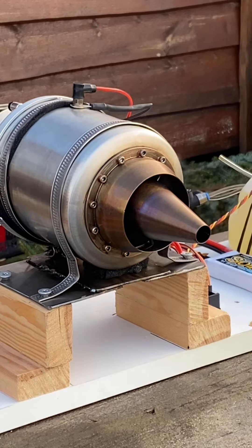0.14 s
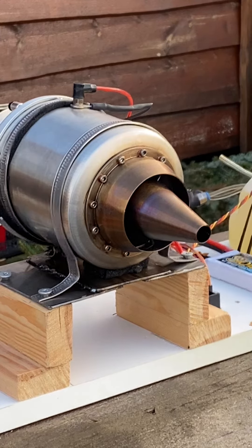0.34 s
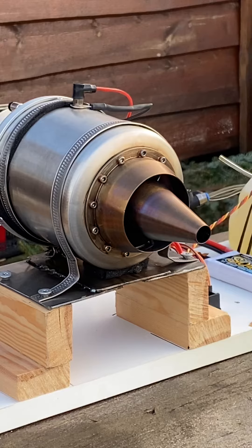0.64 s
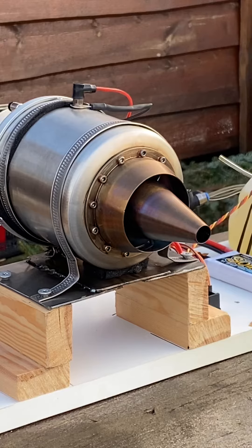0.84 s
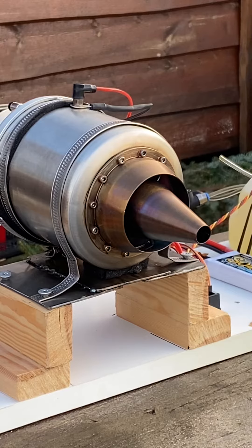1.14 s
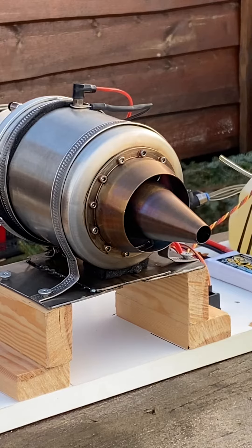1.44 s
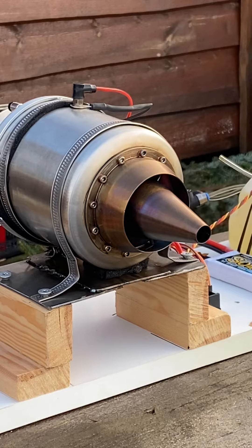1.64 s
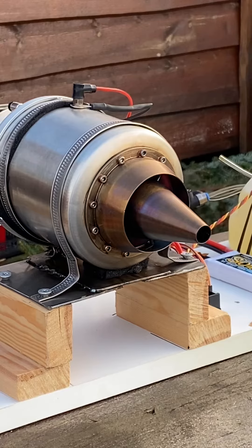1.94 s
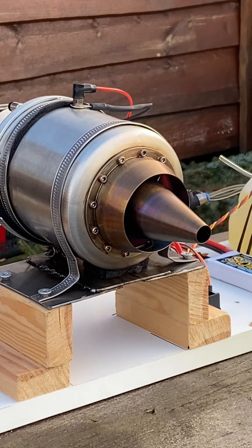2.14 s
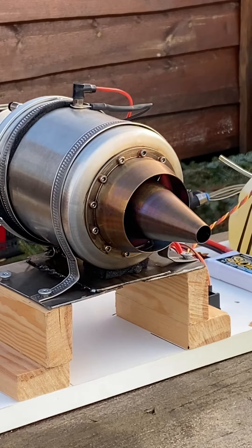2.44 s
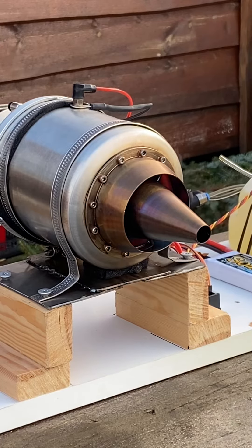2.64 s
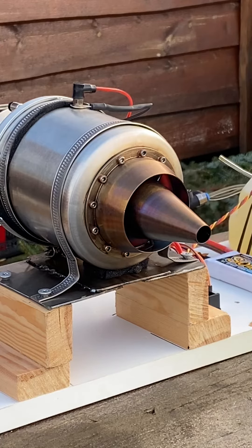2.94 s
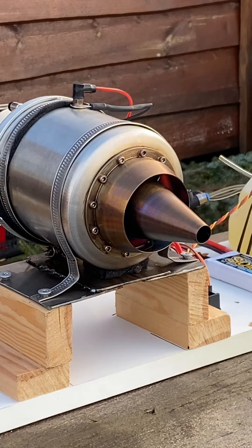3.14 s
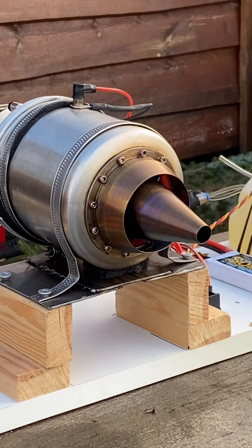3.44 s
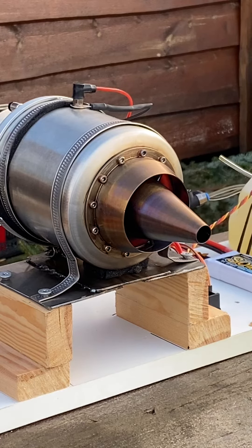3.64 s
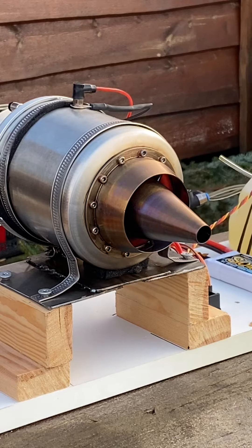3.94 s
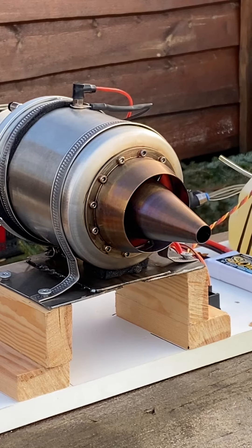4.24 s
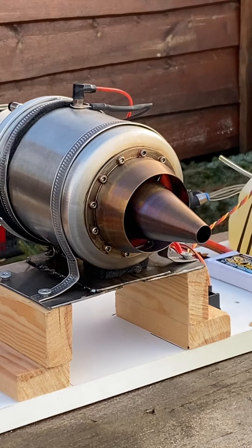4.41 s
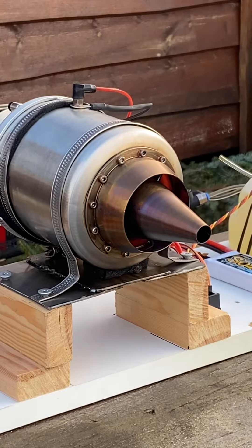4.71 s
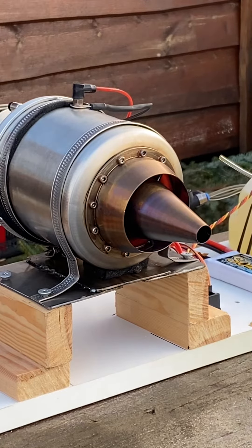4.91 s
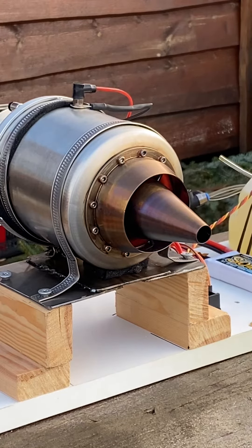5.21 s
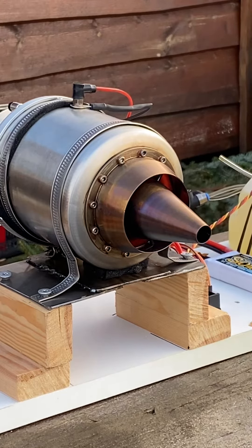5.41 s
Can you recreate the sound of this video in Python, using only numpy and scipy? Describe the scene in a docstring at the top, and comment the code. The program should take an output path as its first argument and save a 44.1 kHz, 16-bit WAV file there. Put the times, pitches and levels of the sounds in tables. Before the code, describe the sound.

For about 5.6 seconds a small turbojet runs close to a stereo microphone outdoors, dry and without audible echo. From 0 s it is already loud: an unevenly fluttering low burning rumble and roar, strongest around 200-400 Hz, a dense exhaust rush and a bright airy hiss. A compressor whine starts near 2.6 kHz and climbs almost steadily to about 4.5 kHz, while the turbine whine rises from 5 to nearly 8.7 kHz, with a still higher octave above. Thin, glassy bearing tones climb alongside, flickering and swelling through resonances. As the engine heats, the deep boom eases slightly and the noise changes colour. A barely noticeable puff comes at 0.75 s, then soft low thumps at 3.3-3.4, a stronger one at 3.65 and another at 3.8 s. From about 4.8 s a faint fuel pump tone near 1.7 kHz sings beneath. The sound ends abruptly, still rising.

```python
"""Small turbojet spooling up

A small turbojet spools up on a garden test stand, close to a stereo microphone.
Flame, exhaust and hiss are shaped noise whose colour shifts as the gas heats up with shaft speed.
Blade and bearing tones are sines locked to the shaft, swelling through duct and casing resonances.
Low puffs of uneven burning break in, and near the end the fuel pump's motor sings faintly.
The treble reaches the left microphone port a little before the right."""
import sys
import numpy as np
from scipy.fft import rfft, irfft, next_fast_len
from scipy.io import wavfile
from scipy.ndimage import map_coordinates

SR = 44100
rng = np.random.default_rng(int(sys.argv[2]) if len(sys.argv) > 2 else 0)


def store_pcm(level_fs):
    """Save levels as 16-bit WAV."""
    pcm = np.round(np.clip(level_fs, -1, 1) * 32767).astype(np.int16)
    wavfile.write(sys.argv[1], SR, np.atleast_2d(pcm).T)


N = 245637

# Shaft speed as it spools up, before a slight unsteadiness: [t/s, speed/(turns/s)]
SHAFT_SPEED = [(0.0, 216.78), (0.41, 228.24), (1.16, 248.32), (1.94, 270.29), (2.23, 279.59),
               (2.74, 295.56), (3.14, 307.13), (3.59, 318.54), (3.74, 322.56), (4.28, 336.32),
               (4.53, 343.14), (5.08, 362.14), (5.34, 369.63), (5.57, 376.67)]
# The gas is cool below the first shaft speed and hot above the second (turns/s)
COOL_SPEED, HOT_SPEED = 234.7, 340
TOP_HZ = 15800  # band limit of the whole sound
# Where boom gives way to roar, roar to exhaust, and exhaust to hiss: [f/Hz each]
EDGES_HZ = (420, 1380, 6800)

# Uneven level of the low noise: [t/s, spread (Gaussian sigma)/s, boom change/dB, roar change/dB]
LOW_NOISE_CHANGES = [(0.075, 0.018, 0.5, 3.5), (0.235, 0.034, -2.5, 1.5), (0.338, 0.014, 1, 0),
                     (0.467, .016, -1, 3), (0.59, 0.018, -0.5, -2), (0.7, 0.017, 3, .6),
                     (0.943, 0.054, 0, 2.5), (1.03, 0.016, 1, -0.5), (1.25, .015, 1.5, 1),
                     (1.343, .035, -2, -2), (1.635, 0.026, 2.5, -0.5), (1.76, .025, 0, -2),
                     (1.93, 0.031, -3, 2), (2.17, .016, 0.5, 0.5), (2.25, 0.028, 3, 0.5),
                     (2.37, 0.028, -2.5, -1.5), (2.426, .019, 3, 0), (2.567, 0.067, -1, 1),
                     (2.662, .015, 3.5, 2.5), (2.78, .016, 3, -1), (2.87, 0.016, 1, 4),
                     (3.248, 0.015, 1, 1.5), (3.36, 0.019, 1, 3.5), (3.433, 0.032, -2, -1.5),
                     (3.903, 0.013, 2.5, 1.5), (4.64, .018, -4, 0), (4.75, 0.021, 2.6, 1),
                     (4.92, .03, -0.5, -1.5), (4.99, .016, -2, 0.5), (5.143, .045, 0.5, 1),
                     (5.468, 0.011, -5, -1.3)]
# Low puffs of uneven burning: [t/s, level before the low cut/dB, starting f/Hz]
PUFFS = [(0.742, -29, 55), (3.297, -17.5, 165), (3.364, -25, 100), (3.638, -12.5, 190), (3.803, -23, 150)]
# Relative colour of the burning: [f/Hz, cool, half warmed and hot level/(dB per Hz)]
COMBUSTOR_COLOUR = [(21.1, -51, -48, -49), (60.3, -20, -17.5, -15), (88.5, -20, -18, -16),
                    (127, -11, -9.5, -7), (164, -4.5, -7.5, -5), (188, -2.0, 0, -3.5), (262, -3, 2, -0.5),
                    (294, -4, -4.5, 1), (367, 2.5, -0.5, 0), (448, -4, 0, -3.5), (535, -7, -5, -0.5),
                    (628, -10.5, -8.5, -4.5), (743, -12, -11, -11), (830, -19, -15.5, -16),
                    (1004, -21, -13.5, -13.5), (1227, -30.5, -24.5, -26.5), (1430, -31.5, -33, -25)]
# Relative colours of the exhaust and the hiss: [f/Hz, cool level/(dB per Hz), hot level/(dB per Hz)]
EXHAUST_COLOUR = [(1462, -14.5, -18), (1477, 0, -2.5), (1550, -5.5, -8), (1970, 3.5, -0.5), (2210, 3, 1.5),
                  (2390, 0, -1), (3360, -2, -5), (3920, -7, -3), (4230, -9.5, -8.5), (4250, -3, -4.5),
                  (4860, -3.5, -2.5), (5370, -1.5, -3), (5300, 1, -4), (7540, -15.5, -13.5)]
HISS_COLOUR = [(6700.0, -4.0, -4.1), (7300.0, 0.0, -0.5), (7900.0, -2.7, -0.1), (8400.0, -2.7, -2.3),
               (9400.0, -4.9, -1.9), (10000.0, -4.9, -4.1), (10600.0, -3.7, -5.5), (11050.0, -1.6, -4.9),
               (11600.0, -3.9, -5.3), (12100.0, -1.0, -2.8), (12500.0, -4.5, -4.2), (13200.0, -3.1, -2.6),
               (14300.0, -3.5, -3.1), (15700.0, -5.6, 0.0)]
# Base level of each kind of turbulence: [cool level/dB, half warmed level/dB, hot level/dB]
BOOM_LEVEL_DB = (-16.5, -18, -21)
ROAR_LEVEL_DB = (-21.5, -21, -22.5)
EXHAUST_LEVEL_DB = (-26.5, -26, -26.5)
HISS_LEVEL_DB = (-31.5, -34, -30.5)

# Compressor tone, turbine tone and the turbine's octave: [cycles per turn each]
BLADE_ORDERS = (12, 23, 46)
# Depth of the blade tones' flicker: [cool depth/dB, half warmed depth/dB, hot depth/dB]
BLADE_WAVER_DB = (2.0, 1.2, 1.0)
# Duct resonances that each blade tone swells through: [f/Hz, width/Hz, relative level/dB]
DUCT_RESONANCES = [(2810, 60, -39.5), (2895, 50, -39.5), (2965, 50, -40), (3055, 40, -40),
                   (3159, 30, -35.3), (3400, 130, -35.5), (3560, 460, -31.2), (3680, 60, -37),
                   (3775, 50, -36.5), (3825, 45, -35.5), (3965, 45, -39), (4015, 40, -40.5),
                   (4088, 36, -32.8), (4128, 36, -35.5), (4230, 70, -37.3), (4305, 80, -37.3),
                   (4390, 45, -34), (4448, 95, -30), (4520, 40, -34.5), (4990, 200, -42.5),
                   (5820, 140, -41), (5275, 80, -38), (5510, 130, -37), (5520, 800, -35.6),
                   (6010, 60, -39.5), (6227, 178, -39.5), (6870, 70, -43), (7372, 550, -37.7),
                   (7823, 70, -39.5), (8535, 381, -38.8), (9976, 923, -37.2), (11350, 200, -46),
                   (12060, 300, -35), (12420, 260, -35.5), (12900, 520, -36), (14006, 434, -38.5),
                   (15270, 1130, -34)]
# Narrow gaps between resonances where a tone cancels: [f/Hz, width/Hz, level/dB]
DUCT_NOTCHES = [(3905, 80, -15), (4052, 20, -8), (4168, 32, -20), (5134, 40, -5)]

# Thin tones of the shaft and its ball bearings, relative levels:
# [cycles per turn, cool level/dB, half warmed level/dB, hot level/dB]
THIN_TONES = [(21.81, -57.5, -57.0, -50.0), (24.0, -42.5, -54.5, -41.0), (28.0, -55.5, -51.0, -43.0),
              (28.75, -49.5, -51.5, -52.0), (31.28, -52.0, -53.0, -50.5), (34.97, -48.0, -51.5, -39.5),
              (35.69, -52.0, -44.0, -48.5), (36.22, -48.0, -42.5, -46.5), (36.97, -51.5, -51.5, -48.0),
              (37.97, -62.0, -64.5, -50.0), (38.22, -53.0, -48.0, -57.0), (41.91, -63.5, -61.0, -54.0),
              (42.16, -61.0, -52.5, -47.5), (43.16, -42.5, -40.0, -44.5), (43.62, -66.5, -67.0, -52.0),
              (43.91, -53.5, -62.0, -50.0), (44.16, -66.0, -65.0, -53.5), (44.91, -68.0, -69.5, -46.5),
              (45.16, -52.0, -59.5, -60.5), (46.16, -60.0, -59.0, -44.0), (49.09, -61.0, -51.5, -38.5),
              (50.09, -46.0, -46.0, -44.0), (51.36, -40.5, -48.0, -51.0), (52.09, -54.0, -56.5, -57.5),
              (54.38, -56.5, -52.5, -52.0), (56.03, -63.5, -51.0, -50.5), (56.41, -58.0, -55.0, -54.5),
              (57.31, -55.5, -51.0, -50.5), (58.31, -41.5, -49.5, -49.5), (59.56, -50.5, -63.0, -61.5),
              (60.3, -42.0, -54.5, -53.5), (61.31, -53.0, -54.0, -53.5), (64.25, -49.0, -43.5, -43.5),
              (65.25, -52.0, -51.5, -51.0), (66.5, -46.5, -48.5, -48.5), (67.22, -47.5, -49.5, -49.0)]
# Casing resonances that the thin and faint tones climb through: [f/Hz, level/dB]
CASING_RESONANCES = [(5000.0, -8.0), (6200.0, 2.5), (6700.0, -4.0), (7200.0, 4.0), (7800.0, -6.5),
                     (8300.0, -2.0), (8800.0, -9.0), (9400.0, -7.5), (9900.0, -11.5), (10300.0, -11.0),
                     (10435.0, -3.0), (10570.0, 1.0), (10840.0, -5.0), (10975.0, 4.0), (11110.0, 1.5),
                     (11245.0, -4.5), (11380.0, 4.0), (11515.0, -4.5), (11650.0, -8.0), (11785.0, -3.0),
                     (11920.0, -1.0), (12055.0, 3.5), (12190.0, -3.5), (12325.0, -5.0), (12595.0, -2.0),
                     (12730.0, -3.5), (12865.0, -1.5), (13000.0, 5.0), (13270.0, 5.5), (13405.0, 3.0),
                     (13540.0, 6.0), (13675.0, 3.5), (13810.0, -2.0), (13945.0, 4.5), (14215.0, 2.5),
                     (14350.0, 5.0), (14485.0, 5.0), (14620.0, 1.5), (14890.0, 6.0), (15025.0, 1.5),
                     (15160.0, 3.0), (15295.0, -0.5), (15430.0, 1.5), (15565.0, 1.5), (15700.0, -4.0)]
# Range of the balls' many fainter tones, before scatter: [lowest, highest cycles per turn]
FAINT_ORDERS = (28, 66)
# The fuel pump's motor as it is turned up: [t/s, speed/(turns/s), level/dB]
PUMP_RUN = [(4.55, 330, -70), (4.8, 346, -54), (4.95, 340, -39), (5.08, 347, -51), (5.17, 346, -43),
            (5.3, 350, -40), (5.57, 360, -43)]

# Phase by which the left port leads, negative where the right leads: [f/Hz, lead/rad]
PORT_LEAD = [(110, 0), (250, -.14), (500, -.44), (1250, -.3), (1550, 0), (2500, .2), (3900, 0), (4450, .75),
             (5050, .05), (7100, 3.1), (7800, 3.25), (9900, 6.15), (11100, 6.35), (13100, 9.35),
             (13900, 9.5), (15700, 12)]
# Correlation of the left and right noise: [f/Hz, correlation, 1 = identical]
NOISE_CORRELATION = [(150, .9995), (650, .985), (1250, .92), (1800, .995), (2500, .95), (3300, .995),
                     (5000, .95), (6100, .79), (7300, .99), (9000, .68), (10400, .99), (11800, .7),
                     (13400, .99), (15000, .77)]
# Level balance of the ports: [f/Hz, left minus right level/dB]
PORT_BALANCE = [(90, 0), (290, 1.2), (390, 2), (600, .1), (800, -.2), (1100, 2.1), (1550, 0)]


def flame(heat, flutter_db=0.5, flutter_rate=20):
    """Burning booms and roars in the combustor, uneven in level; the boom eases with heat."""
    boom_db = warmed(BOOM_LEVEL_DB, heat) + flutter_db * wobble(flutter_rate)
    roar_db = warmed(ROAR_LEVEL_DB, heat) + flutter_db * wobble(flutter_rate)
    for s, spread_s, boom_change_db, roar_change_db in LOW_NOISE_CHANGES:
        change = swell(s, spread_s)
        boom_db = boom_db + boom_change_db * change
        roar_db = roar_db + roar_change_db * change
    boom = gas(COMBUSTOR_COLOUR, 20, EDGES_HZ[0], heat)
    roar = gas(COMBUSTOR_COLOUR, EDGES_HZ[0], EDGES_HZ[1], heat)
    return amp(boom_db) * boom + amp(roar_db) * roar


def puffs(rise_s=0.0052, fall_s=0.014, lowest_hz=40):
    """Each puff is an abrupt, low swing of pressure that dies away while its pitch sinks."""
    out = np.zeros(N)
    for s, db, start_hz in PUFFS:
        age = np.maximum(np.arange(N) / SR - s, 0)
        # pitch slides from start_hz towards lowest_hz
        cycles = lowest_hz * age + (start_hz - lowest_hz) * fall_s * (1 - np.exp(-age / fall_s))
        envelope = age / rise_s * np.exp(1 - age / rise_s)
        out += amp(db) * envelope * np.sin(2 * np.pi * cycles)
    low_cut = lambda hz: hz ** 2 / (hz ** 2 + lowest_hz ** 2)
    return filtered(out, low_cut)


def stream(heat, flicker_db=0.5, flicker_rate=90):
    """Hot gas rushes out of the nozzle and air hisses past the blades; the same eddies shake both."""
    eddies_db = flicker_db * wobble(flicker_rate)
    exhaust_gain = amp(warmed(EXHAUST_LEVEL_DB, heat) + eddies_db)
    exhaust = exhaust_gain * gas(EXHAUST_COLOUR, EDGES_HZ[1], EDGES_HZ[2], heat)
    hiss_gain = amp(warmed(HISS_LEVEL_DB, heat) + eddies_db)
    hiss = hiss_gain * gas(HISS_COLOUR, EDGES_HZ[2], SR / 2, heat)
    return exhaust + hiss


def blades(turns, speed, heat, haze_db=-8, waver_rate=38, level_db=1.7):
    """Twelve compressor and 23 turbine blades sound their passing rates, the turbine also its octave."""
    out = np.zeros((2, N))
    for order in BLADE_ORDERS:
        shortness = order / BLADE_ORDERS[-1]  # short waves are scattered most
        core = tone(order * turns, rough=0.3 * shortness, flutter_rate=70)
        # eddies in the blade wakes smear a narrow haze round each line, separately at each port
        haze = np.array([tone(order * turns, rough=7.3, flutter_rate=340) for port in range(2)])
        waver_db = warmed(BLADE_WAVER_DB, heat) * wobble(waver_rate)
        strength = duct(order * speed) * amp(level_db + waver_db)
        out += strength * (core + amp(haze_db) * shortness * haze)
    return out


def whine(turns, speed, heat, level_db=1.3, flicker_db=2, flicker_rate=11):
    """Thin shaft and bearing tones flicker, each swelling as it climbs through casing resonances."""
    out = np.zeros(N)
    for order, *db in THIN_TONES:
        casing_db = along(CASING_RESONANCES, order * speed)
        strength_db = warmed(db, heat) + casing_db + flicker_db * wobble(flicker_rate)
        out += amp(strength_db) * tone(order * turns, rough=0.3, flutter_rate=120)
    return amp(level_db) * out


def shimmer(turns, count=36, level_db=-55, swing_db=3, swing_rate=3):
    """A crowd of faint bearing tones at uneven multiples of the shaft speed, each coming and going."""
    orders = np.linspace(*FAINT_ORDERS, count) + rng.uniform(-0.43, 0.34, count)
    crowd = np.zeros(N)
    for order in orders:
        strength = amp(level_db + swing_db * wobble(swing_rate))
        crowd += strength * np.sin(2 * np.pi * (order * turns + rng.random()))
    return filtered(crowd, lambda hz: amp(along(CASING_RESONANCES, hz)))


def pump(lower_db=-8):
    """The fuel pump's motor sings faintly on the fourth and fifth multiples of its speed."""
    speed, db = curves(PUMP_RUN)
    turns = np.cumsum(speed) / SR
    fourth = tone(4 * turns, rough=0.24, flutter_rate=50)
    fifth = tone(5 * turns, rough=0.24, flutter_rate=50)
    return amp(db) * (fifth + amp(lower_db) * fourth)


def gas(table, lo_hz, hi_hz, heat):
    """Turbulence whose colour crossfades in power from the coolest to the hottest as heat goes 0 to 1."""
    f, *colours = np.transpose(table)
    out = 0
    for share_row, db in zip(np.eye(len(colours)), colours):
        points = np.c_[f, db]
        colour = lambda hz: amp(along(points, hz)) * band(hz, lo_hz, hi_hz) * (hz < TOP_HZ)
        out = out + np.sqrt(warmed(share_row, heat)) * rush(colour)
    return out


def rush(colour):
    """Stereo turbulence of rms 1: noise partly alike in left and right, with the given gain over frequency."""
    def spread(hz):
        # the angle between middle and side sets the correlation of left and right
        turn = np.arccos(np.clip(along(NOISE_CORRELATION, hz), -1, 1)) / 2
        return colour(hz) * np.array([np.cos(turn), np.sin(turn)])
    mid, side = filtered(rng.standard_normal((2, N)), spread)
    return unit(np.array([mid + side, mid - side]))


def tone(turns, rough, flutter_rate):
    """A tone of rms 1, scattered in level and phase by the turbulent gas it crosses."""
    phase = 2 * np.pi * (turns + rng.random())
    in_step = (1 + rough * wobble(flutter_rate)) * np.sin(phase)
    quarter_off = rough * wobble(flutter_rate) * np.cos(phase)
    return unit(in_step + quarter_off)


def duct(hz):
    """Gain of a blade tone at this pitch: duct resonances add in power, and notches cut in between."""
    bell = lambda centre, width: 1 / (1 + (2 * (hz - centre) / width) ** 2)
    power = sum((amp(db) * bell(centre, width)) ** 2 for centre, width, db in DUCT_RESONANCES)
    notch_db = sum(db * bell(centre, width) ** 2 for centre, width, db in DUCT_NOTCHES)
    return np.sqrt(power) * amp(notch_db)


def warmed(values, heat):
    """The value that goes with the heat of the gas, from cool (0) to hot (1)."""
    return np.interp(heat, np.linspace(0, 1, len(values)), values)


def swell(s, spread_s):
    """A smooth Gaussian rise and fall of height 1 around the time s."""
    return np.exp(-((np.arange(N) / SR - s) / spread_s) ** 2 / 2)


def wobble(rate):
    """A smooth random curve with rate knots a second."""
    at = np.linspace(0, N, N // 32)  # a coarse time grid is enough
    knots = rng.standard_normal(int(N * rate / SR) + 4)
    slow = map_coordinates(knots, [at * rate / SR])
    return np.interp(np.arange(N), at, slow)


def band(hz, lo_hz, hi_hz):
    """Steep edges that add up to even power where two bands meet."""
    return np.sqrt(1 / (1 + (lo_hz / (hz + 1)) ** 24) / (1 + (hz / hi_hz) ** 24))


def filtered(x, response):
    """x shaped by a complex response of frequency."""
    size = next_fast_len(N + SR // 2)  # spare room for the filter's ringing
    return irfft(rfft(x, size) * response(np.fft.rfftfreq(size, 1 / SR)), size)[..., :N]


def along(points, hz):
    """Read (f/Hz, value) points on a log frequency axis."""
    f, v = np.transpose(points)
    return np.interp(np.log(hz + 1), np.log(f + 1), v)


def curves(rows):
    """One value per sample for each column after the time."""
    s, *cols = np.transpose(rows)
    return [np.interp(np.arange(N) / SR, s, c) for c in cols]


def amp(db):
    """Decibels to gain."""
    return 10 ** (np.asarray(db) / 20)


def unit(x):
    """Scale to rms 1."""
    return x / np.sqrt(np.mean(np.abs(x) ** 2) + 1e-20)


def scene():
    """The shaft drives the engine's tones and the heat of the gas; all sound then reaches the two ports."""
    speed = curves(SHAFT_SPEED)[0] * (1 + 0.00012 * wobble(14))  # slightly unsteady
    turns = np.cumsum(speed) / SR
    heat = np.clip((speed - COOL_SPEED) / (HOT_SPEED - COOL_SPEED), 0, 1)
    engine = flame(heat) + puffs() + stream(heat)
    engine = engine + blades(turns, speed, heat) + whine(turns, speed, heat)
    engine = engine + shimmer(turns) + pump()
    half = np.array([[1], [-1]]) / 2  # each port takes half of the level and phase difference

    def ports(hz):
        return amp(half * along(PORT_BALANCE, hz)) * np.exp(1j * half * along(PORT_LEAD, hz))
    return filtered(engine, ports)


def record(dry):
    """Nothing passes above the band limit."""
    return filtered(dry, lambda hz: hz < TOP_HZ)


dry = scene()
out = record(dry)
store_pcm(out)
```